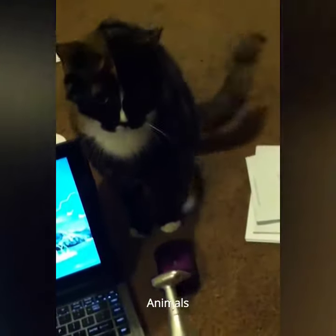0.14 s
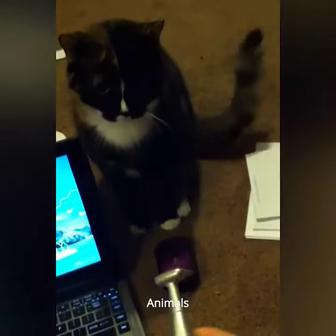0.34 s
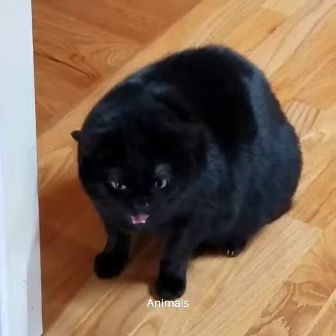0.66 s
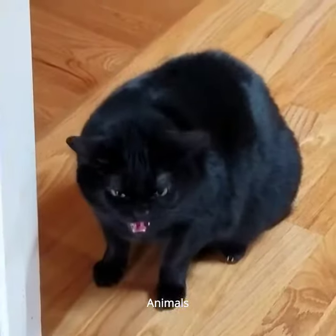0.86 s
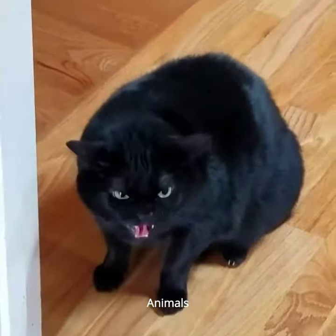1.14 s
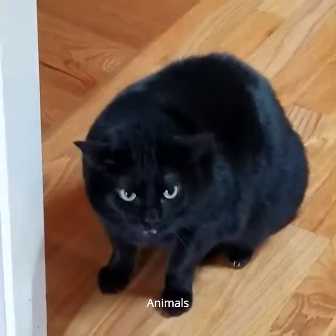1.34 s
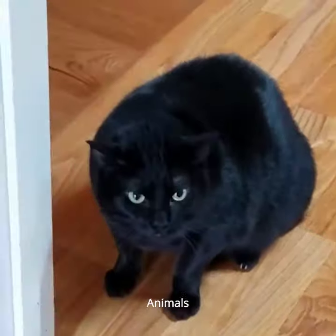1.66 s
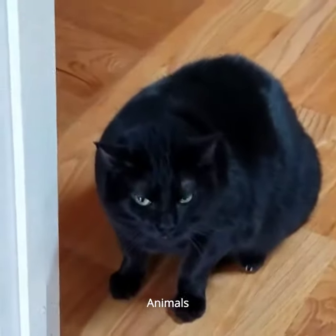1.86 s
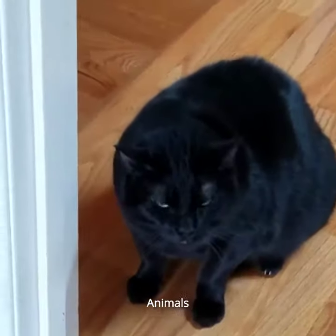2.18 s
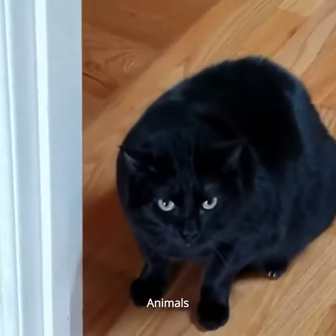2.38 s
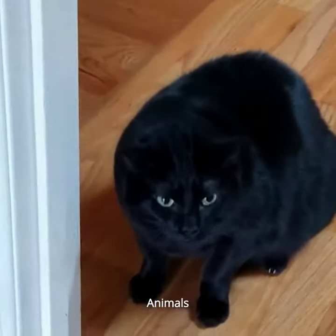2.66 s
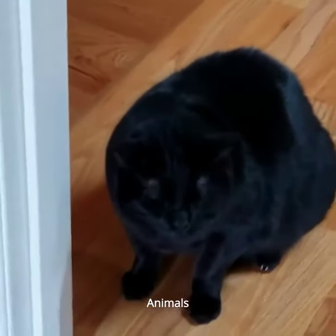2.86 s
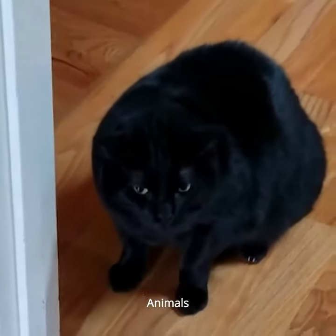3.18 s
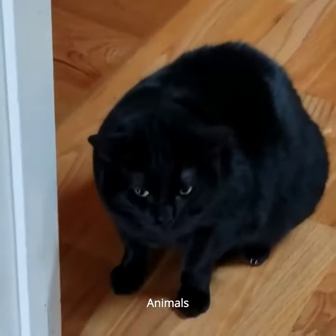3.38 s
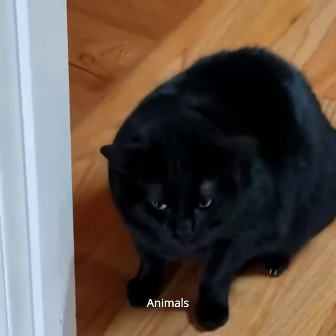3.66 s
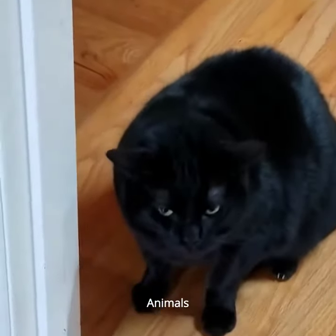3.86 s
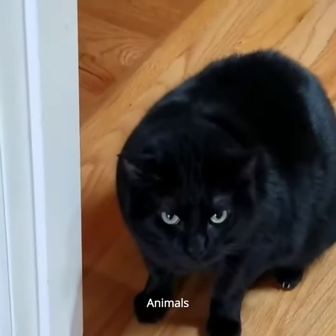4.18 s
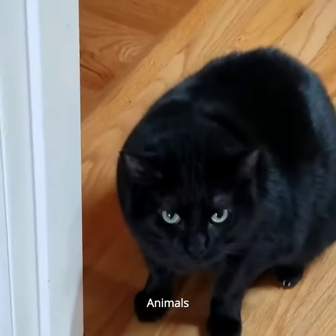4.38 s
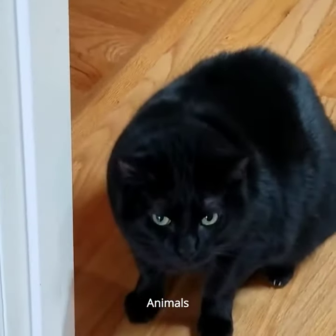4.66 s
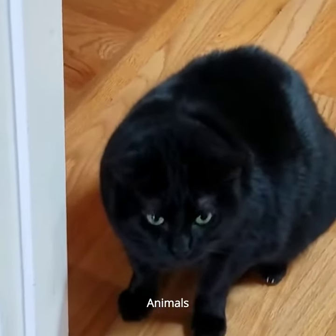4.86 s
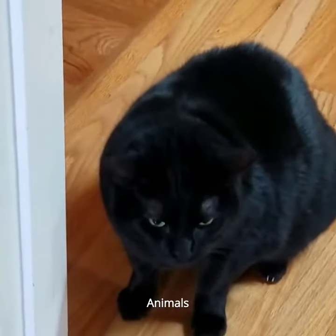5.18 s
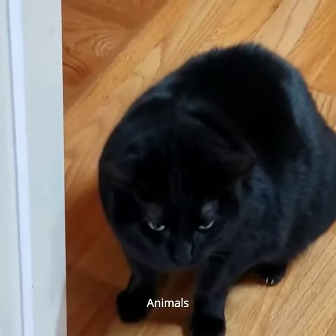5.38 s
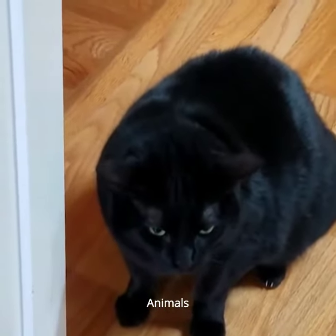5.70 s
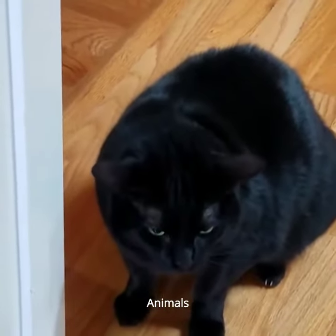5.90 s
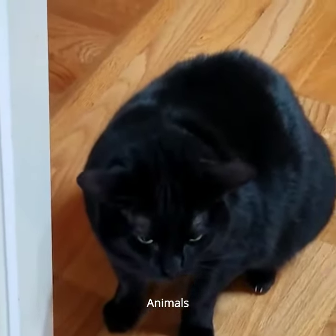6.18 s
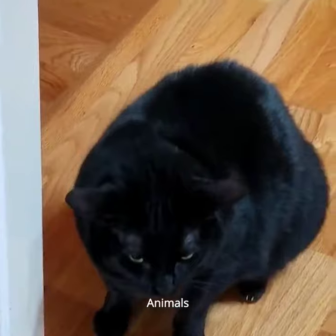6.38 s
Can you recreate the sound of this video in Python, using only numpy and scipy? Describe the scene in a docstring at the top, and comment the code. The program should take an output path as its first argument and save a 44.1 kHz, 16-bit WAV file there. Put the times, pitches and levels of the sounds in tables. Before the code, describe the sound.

A small electric appliance buzzes with a rapid, clicking plastic rattle for just over half a second, then cuts off. In a lightly reverberant room with a faint low engine drone, a cat gives a short breathy hiss with a low grumble. After soft bumps it yowls long and loud, sinks into a growl, then rises into a second yowl that ends in a ragged screech. The microphone is close.

```python
"""A small electric appliance buzzes and rattles; then the scene cuts to a cat on a wooden floor.
Its strokes repeat a click, softer knocks and a scrape. After soft scuffs of band-limited noise the cat
hisses: shaped noise over a loose grumble. It yowls twice without a pause, as harmonics picked out by moving
resonances, sinking to a growl in between and breaking into a screech at the end. Sparse reflections answer
the cat and the scuffs; a far engine, a few low orders of a falling rate, drones over the air of the room."""
import sys
import numpy as np
from scipy import signal
from scipy.fft import rfft, irfft, next_fast_len
from scipy.io import wavfile
from scipy.ndimage import map_coordinates

SR = 44100
rng = np.random.default_rng(int(sys.argv[2]) if len(sys.argv) > 2 else 0)


def persist_wave(psi):
    """Save psi, clipped to +-1, as 16-bit WAV."""
    counts = np.round(np.clip(psi, -1, 1) * 32767).astype(np.int16)
    wavfile.write(sys.argv[1], SR, np.atleast_2d(counts).T)


N = 288414
T = np.arange(N) / SR  # t/s
HZ = np.fft.rfftfreq(N, 1 / SR)  # f/Hz
CUT_S = 0.631  # the change of scene

# All levels are relative, before the gains applied where the sounds are summed.
# Appliance stroke rate: [t/s, f/Hz]
STROKE_RATE = [(0, 55.3), (.09, 55.55), (.14, 54.45), (.2, 54.8), (.28, 55.25), (.41, 55.35), (.47, 55.7),
               (.53, 55.3), (.58, 54.3), (.64, 54.8)]
# Main click of each stroke
CLICK_HZ, CLICK_S, CLICK_DB = 6300, .00009, -23.5
# Ringing of the plastic housing: [f/Hz, level/dB, t60/s]
HOUSING_MODES = [(4340, -52, 0.021), (4700, -47, 0.023), (4720, -44, 0.029), (5640, -45, 0.048),
                 (7800, -47, 0.018), (2070, -53, 0.048), (3130, -51, .05)]
# Softer knocks within a stroke: [place in the stroke 0-1, level/dB, f/Hz, length/s]
KNOCKS = [(.014, 5, 6800, .0001), (.115, -2, 4400, .0004), (.325, -3, 5600, .00025), (.34, -4, 4500, .0006),
          (.33, -14, 2000, .0008), (.445, 0, 5600, .0005), (.49, -3, 7800, .0004), (.52, -2, 5800, .0003),
          (.535, -2, 7300, .0002), (.55, -4, 3500, .0004), (.68, -8, 5800, .0005), (.77, -5, 5500, .00025),
          (.78, -9, 3300, .0003), (.89, -7, 4500, .0004), (.935, -4, 7000, .0003), (.945, -3, 4500, .0003)]
# Spectrum of the scraping parts: [f/Hz, level/dB]
RATTLE_COLOUR = [(700, -50), (1200, -38), (1650, -12), (2050, -0.5), (2250, -4.5), (2600, -5.5), (3050, -5),
                 (3900, -3), (4500, 4), (5060, -5.5), (5680, -2), (6700, -9), (8000, -3), (9200, -11.5),
                 (11000, -36), (15000, -37)]
RATTLE_DB = -44.5
# Spectrum of the low hum: [f/Hz, level/dB]
HUM_COLOUR = [(65, -43), (110, -8), (221, -3.5), (332, -12.5), (404, -14.5), (451, -18), (632, -11),
              (1200, -17.5), (1500, -14), (1950, -29), (3300, -120)]
HUM_DB = -55
# Low tones of the motor: [multiple of the stroke rate, level/dB]
MOTOR_TONES = [(2, -64.5), (3, -71), (4, -60.5)]

# Far engine's orders 1, 2 and 3: [t/s, level/dB, level/dB, level/dB]
ENGINE_ORDERS = [(.63, -53.5, -60, -66), (1.85, -53, -56, -66), (2.3, -53, -59, -66), (3.0, -55, -52, -62),
                 (4.0, -66.5, -59, -62), (5.3, -50.5, -58, -62), (6.54, -57.5, -64, -60)]
ENGINE_HZ, ENGINE_SAG_HZ_PER_S = 73.2, 1.72  # firing rate at the cut, and its fall
# Spectrum of the still air: [f/Hz, level/dB]
AIR_COLOUR = [(18, -34.5), (30, -13.5), (69, -18), (108, -14.5), (144, -14), (369, -12.5), (410, -21.5),
              (532, -16), (691, -19), (830, -24.5), (1050, -25), (2830, -29.5), (3880, -35.5), (15500, -54)]
AIR_DB = -56.5
# Wavering top hiss: level/dB [outside the strong parts of the yowls, within them, within them]
SHEEN_DB = [-67.5, -61, -61]
# Reverberation time of the room: [f/Hz, t60/s]
ROOM_DECAY = [(150, 0.25), (500, 0.73), (1000, 0.5), (3000, 0.74), (10000, 0.3)]
# Scuffs, spits and bumps: [t/s, level/dB, centre f/Hz, width/octaves, rise/s, decay/s]
SCUFFS = [(.66, -57.5, 2280, 0.12, 0.065, 0.22), (.66, -53, 1440, 1.3, 0.45, 0.068),
          (0.707, -45.5, 167, 1, 0.052, 0.076), (.889, -53, 1190, 0.81, .001, 0.0047),
          (1.46, -57, 8850, 6.1, 0.041, 0.049), (1.571, -43, 219, 0.47, 0.0055, 0.013),
          (1.891, -63, 4000, 1.8, 0.0042, 0.073), (2.009, -44, 65, 1.68, 0.029, 0.029),
          (2.224, -48, 1690, 0.53, 0.01, 0.05), (2.276, -38.5, 109, 1.32, 0.035, 0.018),
          (2.28, -57.5, 780, 0.76, 0.0074, 0.1), (2.315, -59, 13000, 2.5, 0.1, 0.11),
          (2.46, -46.5, 65, 0.64, 0.0063, 0.012), (2.641, -64, 8100, 3, 0.025, 0.012),
          (3.599, -46.5, 223.5, 0.42, 0.031, 0.066), (4.071, -38.5, 261, 0.91, 0.047, 0.031),
          (4.37, -46, 110.5, 1.53, 0.017, 0.032)]

# Spectrum of the hiss: [f/Hz, level/dB]
HISS_COLOUR = [(120, -9), (200, -4), (350, -3.5), (550, -13), (750, -3), (980, 1), (1180, 0), (1500, -9),
               (2300, -14.5), (3200, -22.5), (4200, -22), (7000, -25.5), (10000, -26), (15500, -22.5)]
HISS_START_S, HISS_END_S, HISS_RISE_S, HISS_FALL_S = 0.9, 1.282, 0.066, 0.025
HISS_MOUTH_DB, HISS_FIZZ_DB, HISS_SWELL_DB_PER_S = -43, -51.5, 3.5
# Low grumble under the hiss: resting pitch and height of its arch
GRUMBLE_HZ, GRUMBLE_ARCH_HZ, GRUMBLE_DB, GRUMBLE_SWELL_DB_PER_S = 182, 59.8, -54, 21

YOWL_START_S, YOWL_RISE_S = 2.55, 0.24
# Pitch climbs out of a growl, holds, sinks back and climbs again: [t/s, f/Hz]
PITCH = [(2.58, 151.6), (2.645, 140.2), (2.685, 204.7), (2.76, 270.3), (2.8, 325.5), (2.88, 385.4),
         (2.995, 451.2), (3.32, 473.7), (3.39, 464.2), (3.58, 501.2), (3.8, 504.5), (3.96, 525.8),
         (4.09, 487.5), (4.4, 447.8), (4.52, 415.5), (4.565, 388.5), (4.61, 331.5), (4.71, 321.8),
         (4.78, 263.4), (4.9, 212.2), (4.98, 193.7), (5.09, 237.4), (5.19, 289.5), (5.27, 356.8),
         (5.39, 388), (5.46, 362), (5.69, 423.7), (5.9, 475), (6.2, 498.1), (6.355, 519.8), (6.38, 548.2),
         (6.42, 553.6), (6.44, 586), (6.47, 555.4), (6.54, 585.7)]
# How hard the cat pushes, as the level of its mouth's ring: [t/s, level/dB]
EFFORT = [(2.6, -77), (2.72, -47), (2.82, -41.5), (3.12, -40), (3.25, -34), (3.33, -28), (3.385, -15),
          (3.45, -21.5), (3.69, -14), (3.79, -13), (3.9, -24.5), (4.03, -28), (4.15, -40.5), (4.57, -46),
          (4.595, -35.5), (4.74, -38), (4.85, -52.5), (5.08, -46.5), (5.18, -34.5), (5.33, -44.5),
          (5.5, -38.5), (5.58, -33.5), (5.74, -21.5), (5.82, -24.5), (6.02, -22), (6.115, -29), (6.16, -19),
          (6.45, -21.5), (6.5, -29), (6.54, -27)]
# Opening of the mouth: [t/s, 0 shut - 1 wide]
MOUTH = [(2.6, .01), (3.3, 0.1), (3.44, 0.51), (3.8, 0.52), (4.02, 0.16), (4.22, 0.013), (5.4, 0.033),
         (5.63, 0.34), (5.95, 0.62), (6.33, 0.79), (6.54, 0.98)]
# Tighter folds sound brighter: [pitch f/Hz, fundamental level/dB, level added to overtones/dB]
FOLDS = [(147, -34.5, -23.5), (202, -34.5, -26), (267, -40.5, -21.5), (324, -36.5, -19), (407.5, -45, -16),
         (444.5, -44.5, -10), (493, -41, -3.5), (524, -40.5, -4.5), (580, -46.5, 5.5)]
# Folds beat raggedly when slack or overstrained: [pitch f/Hz, roughness 0-1]
RAGGED = [(150, .52), (200, .5), (270, .38), (325, .22), (382, .04), (450, .03), (507, .022), (535, .03),
          (570, .12)]
GROWL_PULSE_HZ, GROWL_PULSE_DEPTH = 42, .75
# What the mouth adds to the fundamental: level/dB [shut, half open, wide]
FUNDAMENTAL_DB = [0.5, -4, 4.5]
# The least the harmonics keep: level/dB [second, third]
CHEST_DB = [-55, -57]
# Fourth harmonic, near 2 kHz: [t/s, level/dB]
FOURTH = [(2.9, -76.5), (3.02, -53), (3.08, -45), (3.16, -60.5), (3.29, -46.5), (3.48, -44), (3.62, -45),
          (3.85, -50.5), (3.95, -36), (4.06, -54), (4.25, -70.5), (5.48, -65), (5.67, -49), (5.8, -69.5),
          (6.3, -52)]
# The mouth's ring: f/Hz [shut, half open, wide]
MOUTH_HZ = [500, 960, 1560]
MOUTH_WIDTH_HZ = 198
# Throat resonances, rows nasal ring, bright edge, thin top: f/Hz [shut, half open, wide]
THROAT_HZ = [(2254, 2195, 2565), (3560, 4380, 4220), (4970, 6300, 4800)]
# The same rows: level/dB [shut, half open, wide]
THROAT_DB = [(-42, -39, -35.5), (-59.5, -57, -51.5), (-64, -66, -73)]
# The same rows: half width/Hz [shut, half open, wide]
THROAT_WIDTH_HZ = [(240, 290, 380), (340, 180, 330), (220, 300, 300)]
# Share of the folds' brightness taken up: [nasal ring, bright edge, thin top]
THROAT_SHARE = [1, 0.78, 0.78]
THROAT_SPREAD = 0.58  # mouth opening that spreads the throat fully; beyond it only the jaw drops
# Faint resonances above the throat: [f/Hz shut, f/Hz half open, f/Hz wide, level/dB]
TOP_RINGS = [(6900, 7900, 16000, -72.5), (8480, 8800, 9100, -72)]
# The voice catches, turning airy, rough and bright: [t/s, air level/dB, added roughness 0-1,
# level added/dB to the nasal ring, to the bright edge, to the thin top, rise/s, decay/s]
CATCHES = [(2.82, -53, 0.07, 3, 6, 11, 0.014, .04), (2.955, -64, 0, 16.5, -2, 0, 0.022, 0.035),
           (3.141, -56, 0.02, 0.5, 2, 12.5, .04, 0.047), (3.279, -56, 0, 7, 14, 12, 0.036, 0.065),
           (3.44, -60, 0.01, -1, 10, 6.5, .05, .08), (3.59, -55, 0.01, 0, -2, -5, .03, 0.024),
           (3.965, -63, 0.08, 13, 11, 20, 0.035, .04), (4.023, -38.5, 0.06, -13, 16.5, 9, 0.014, 0.058),
           (4.14, -74, 0.01, -4.5, 13, -2, 0.066, .16), (4.38, -47.5, 0, 2, 5, -6, 0.022, 0.038),
           (4.589, -56, 0.15, 7, 0, -12, .008, 0.05), (5.58, -60.5, 0.03, 18, 21, -1, 0.05, 0.063),
           (5.67, -43.5, 0.02, 0, 5.5, 16.5, 0.04, 0.04), (5.88, -52, 0.25, -4, -3, 10, 0.018, 0.073),
           (6.38, -57, 0.06, 11.5, 2, 9, 0.009, 0.047)]
# Spectrum of the creak: [f/Hz, level/dB]
CREAK_COLOUR = [(70, -27.5), (150, 5), (230, 5), (400, 2.5), (700, -13.5), (1000, -12.5), (1500, -33),
                (3000, -57.5)]
# Spectrum of the air rushing past the folds: [f/Hz, level/dB]
RASP_COLOUR = [(150, -15.5), (500, -13), (850, -3), (1150, 5.5), (1700, -4), (2300, 2.5), (2900, -7.5),
               (3500, -17), (4400, -11), (5500, -19.5), (9000, -20), (15500, -23.5)]
# Strength of that air: level/dB [shut, half open, wide]
RASP_DB = [-64, -58.5, -40]
# Level of the left ear over the right: level/dB [shut, half open, wide]
PAN_DB = [-2.5, -4, -6]
# Thin whistle: [t/s, f/Hz, level/dB]
WHISTLE = [(3.48, 15450, -70.5), (3.58, 14880, -67.5), (3.66, 14100, -63.5), (3.73, 13900, -69),
           (3.799, 13630, -72)]
# Screech in three surges: [t/s, level/dB]
SCREECH = [(6.2, -110), (6.35, -44.5), (6.385, -32), (6.42, -32), (6.445, -26), (6.46, -32.5), (6.477, -20),
           (6.492, -25), (6.52, -19.5), (6.54, -19.5)]
SCREECH_ROUGH = 0.4
# Wide-open throat of the screech: [f/Hz, half width/Hz, level/dB]
SCREECH_THROAT = [(1090, 190, -14), (1620, 270, 0), (2130, 180, -5), (2940, 170, -3.5)]
EDGE_HZ = 15800  # upper band limit


def amp(db):
    """Decibel law: amplitude ratio of a level."""
    return np.exp(np.asarray(db) * (np.log(10) / 20))


def evened(x):
    """Normalisation to an rms of 1."""
    return x / np.sqrt(np.mean(x ** 2) + 1e-20)


def read(points, hz):
    """Interpolation of a spectrum on a log-frequency axis."""
    f, value = np.transpose(points)
    return np.interp(np.log(hz + 1), np.log(f + 1), value)


def curves(rows):
    """Interpolation in time of each column of a table."""
    s, *columns = np.transpose(rows)
    return [np.interp(T, s, c) for c in columns]


def at_pitch(rows, pitch):
    """Interpolation over pitch of each column of a table."""
    hz, *columns = np.transpose(rows)
    return [np.interp(pitch, hz, c) for c in columns]


def phase(hz):
    """Phase as the running integral of frequency, in radians."""
    return 2 * np.pi * np.cumsum(hz) / SR


def colour(x, db):
    """Linear filtering by a dB curve; rms 1."""
    return evened(irfft(rfft(x) * amp(db), N))


def above(hz, order=4):
    """High-pass response, as a dB curve."""
    return -10 * np.log10(1 + (hz / (HZ + 1)) ** (2 * order))


def wander(hz, size=16):
    """Low-pass random fluctuation up to a rate; rms 1."""
    count = next_fast_len(N // size + 2)
    gain = (1 + (np.fft.rfftfreq(count, size / SR) / hz) ** 4) ** -.5
    slow = evened(irfft(rfft(rng.standard_normal(count)) * gain, count))
    return np.interp(T, np.arange(count) * size / SR, slow)


def pair(side):
    """Partial coherence: noise at two ears, partly shared."""
    a, b = rng.standard_normal((2, N))
    return np.array([a + side * b, a - side * b])


def pan(db):
    """Interaural level difference: left and right gains with a mean of 1."""
    g = amp(np.array([db, -db]).reshape(2, -1) / 2)
    return g / g.mean(0)


def peak(hz, centre, width):
    """Resonance: the gain of a steep-sided peak."""
    away = 1 + ((hz - centre) / width) ** 2
    return 1 / (away * np.sqrt(away))


def swell(start, end, rise, decay):
    """Exponential envelope that grows until start, holds until end and dies away."""
    return np.exp(-np.maximum(np.maximum((start - T) / rise, (T - end) / decay), 0))


def glide(values, position, last=1):
    """Interpolation between three values placed at 0, a half and last."""
    return np.interp(position, [0, .5, last], values)


def by_mouth(values, wide=1):
    """Articulation: glides between the values for a shut, a half open and a wide mouth."""
    return glide(values, curves(MOUTH)[0], wide)


def knock(age, hz, length):
    """Impact: a burst at one pitch whose envelope peaks after its length and dies away."""
    u = np.maximum(age, 0) / length
    return u * np.exp(1 - u) * np.sin(2 * np.pi * hz * age)


def appliance(knocks_db=-35):
    """Periodic excitation: every stroke clicks, rings the plastic housing, knocks and scrapes."""
    first_click_s, uneven_db, play_s, loose = .0045, 2.2, .000018, .5
    rate, = curves(STROKE_RATE)
    turns = np.cumsum(rate) / SR - first_click_s * rate[0]
    stroke, number = turns % 1, np.floor(turns).astype(int)
    age = stroke / rate  # seconds since the click
    click = amp(CLICK_DB) * knock(age, CLICK_HZ, CLICK_S)
    ring = sum(amp(db - 60 * age / t60) * np.sin(2 * np.pi * hz * age) for hz, db, t60 in HOUSING_MODES)

    # each knock varies a little in force, and its place creeps from stroke to stroke
    knocks = 0
    for at, db, hz, length in KNOCKS:
        force, creep = rng.standard_normal((2, number[-1] + 2))
        gain = amp(knocks_db + db + uneven_db * force)[number]
        delay = at / rate + play_s * np.cumsum(creep)[number]
        knocks = knocks + gain * knock(age - delay, hz, length)

    # the parts scrape alike from stroke to stroke, shifting slowly, with some loose play
    grains = rng.standard_normal((2, SR // 10))
    place = [stroke * SR / rate.mean()]
    one, other = (map_coordinates(grain, place, order=3) for grain in grains)
    shift = 4 * T
    scrape = one * np.cos(shift) + other * np.sin(shift) + loose * rng.standard_normal(N)
    rattle = amp(RATTLE_DB) * colour(scrape, read(RATTLE_COLOUR, HZ))
    hum = amp(HUM_DB) * colour(.5 * scrape + rng.standard_normal(N), read(HUM_COLOUR, HZ))
    tones = sum(np.sqrt(2) * amp(db) * np.sin(2 * np.pi * round(k) * turns) for k, db in MOTOR_TONES)

    band = signal.butter(9, [95, 9400], "band", fs=SR, output="sos")
    small = signal.butter(2, 1400, "high", fs=SR, output="sos")
    impacts = signal.sosfilt(small, click + ring + knocks)
    return signal.sosfilt(band, impacts + hum + tones) + rattle


def background(waver_db=2):
    """Harmonic series and broadband noise: a far engine's lowest orders over the still air."""
    hz = ENGINE_HZ - ENGINE_SAG_HZ_PER_S * (T - CUT_S)
    turns = phase(hz * (1 + 0.0053 * wander(17)))
    engine = 0
    for k, db in enumerate(curves(ENGINE_ORDERS), 1):
        engine = engine + np.sqrt(2) * amp(db - 4.0 + waver_db * wander(9.1)) * np.sin(k * turns)
    shape = read(AIR_COLOUR, HZ) + above(64, order=1)
    air = colour(pair(0.58), shape) * amp(AIR_DB + 0.18 * wander(3.2))
    return (engine + air) * pan(-1.6)


def sheen(waver_db=2):
    """High-passed noise: a thin, wide, wavering top hiss, louder during the strong parts of the yowls."""
    strength, = curves(MOUTH)  # this curve also marks the strong parts of the yowls
    level_db = glide(SHEEN_DB, strength)
    return colour(pair(0.64), above(12000)) * amp(level_db + waver_db * wander(4))


def room(x, wet_db, mono_hz=450, apart=0.98):
    """Reverberation: sparse reflections die by band; the bass is alike at both ears."""
    size = 20  # samples per reflection
    at = np.arange(size * size // 2, SR - size, size)
    places = at + rng.integers(0, size, (2, len(at)))
    taps = np.zeros((2, SR))
    np.put_along_axis(taps, places, rng.choice([-1., 1.], (2, len(at))), 1)
    hz, t, z = signal.stft(taps, SR, nperseg=256)
    z = z * amp(-60 * t / read(ROOM_DECAY, hz)[:, None])
    side = apart * z[1] * (hz ** 2 / (hz ** 2 + mono_hz ** 2))[:, None]
    tail = signal.istft(np.array([z[0] + side, z[0] - side]), SR, nperseg=256)[1]
    wet = signal.fftconvolve(x, tail / np.linalg.norm(tail[0]), axes=1)[:, :N]
    return (x + amp(wet_db) * wet) / np.sqrt(1 + amp(wet_db) ** 2 / 2)


def scuffs():
    """Band-limited noise: each scuff is a soft-edged puff about one pitch."""
    out, noise = np.zeros((2, N)), rfft(pair(0.36))
    for s, db, hz, octaves, rise, decay in SCUFFS:
        band = np.exp(-.5 * (np.log2((HZ + 1) / hz) / octaves) ** 2)
        out += evened(irfft(noise * band, N)) * amp(db) * swell(s, s, rise, decay)
    return out


def hiss_envelope(swell_db_per_s):
    """Breath envelope: starts quickly, grows while it is held and stops."""
    held_s = np.clip(T, HISS_START_S, HISS_END_S) - HISS_START_S
    return swell(HISS_START_S, HISS_END_S, HISS_RISE_S, HISS_FALL_S) * amp(swell_db_per_s * held_s)


def hiss(crackle_db=2, split_hz=3000, spits_per_s=70, spit_size=13):
    """Turbulence: air sputters through the wet, open mouth and fizzes at the teeth."""
    spits = (rng.random(N) < spits_per_s / SR) * rng.uniform(0.41, 1, N) * spit_size
    air = pair(0.49) * amp(crackle_db * wander(250)) + spits
    shape, high = read(HISS_COLOUR, HZ), above(split_hz)
    low = 10 * np.log10(1 - amp(high) ** 2 + 1e-12)  # the power left below the split
    mouth = colour(air, shape + low) * amp(HISS_MOUTH_DB)
    fizz = colour(air, shape + high) * amp(HISS_FIZZ_DB)
    return (mouth + fizz) * hiss_envelope(HISS_SWELL_DB_PER_S) * pan(-1.6)


def grumble(jitter=0.081, slope_db=-8, top_s=1.13, half_length_s=0.16):
    """Frequency jitter: the folds flap loosely during the hiss, in one arch of pitch."""
    arch = np.maximum(1 - ((T - top_s) / half_length_s) ** 2, 0)
    pitch = GRUMBLE_HZ + GRUMBLE_ARCH_HZ * arch
    turns = phase(pitch * (1 + jitter * wander(80)))
    folds = evened(sum(amp(slope_db * k) * np.cos(k * turns) for k in range(1, 4)))
    return folds * amp(GRUMBLE_DB) * hiss_envelope(GRUMBLE_SWELL_DB_PER_S)


def strain(pitch, air_db=-2, screech_air_db=-40):
    """Fold tension: fundamental dB, throat resonance dB, roughness and air gain of the voice."""
    base, bright = at_pitch(FOLDS, pitch)
    rough, = at_pitch(RAGGED, pitch)
    levels = np.array([by_mouth(db, THROAT_SPREAD) + share * bright
                       for db, share in zip(THROAT_DB, THROAT_SHARE)])
    screech_db, = curves(SCREECH)
    broken = amp(screech_db - screech_db.max())
    air = amp(by_mouth(RASP_DB)) + amp(screech_air_db) * broken
    rough = rough + SCREECH_ROUGH * broken
    for s, db, ragged, *lifts, rise, decay in CATCHES:
        catch = swell(s, s, rise, decay)
        air = air + amp(db) * catch
        rough = rough + ragged * catch
        levels = levels + np.outer(lifts, catch)
    return base + by_mouth(FUNDAMENTAL_DB), levels, np.clip(rough, 0, .9), air * amp(air_db)


def low_harmonics(pitch, base_db, nasal_db, spill_db=-12):
    """Mouth resonance: gains of harmonics 1-4; a dropping jaw moves the ring up from the second."""
    share = np.array([peak(k * pitch, by_mouth(MOUTH_HZ), MOUTH_WIDTH_HZ) for k in range(2, 5)])
    ring = share / np.linalg.norm(share, axis=0) * amp(curves(EFFORT)[0])
    second, third = np.hypot(ring[:2], amp(CHEST_DB)[:, None])
    third = np.hypot(third, amp(nasal_db + spill_db))  # the nasal ring spills onto the third
    fourth = np.hypot(ring[2], amp(curves(FOURTH)[0]))
    return [amp(base_db), second, third, fourth]


def throat_harmonics(pitch, turns, levels, flutter_db=3.0, skirt=0.0066, upper_db=-3.0):
    """Formants: three moving throat resonances pick out the high harmonics."""
    centres = np.array([by_mouth(hz, THROAT_SPREAD) for hz in THROAT_HZ])
    widths = np.array([by_mouth(hz, THROAT_SPREAD) for hz in THROAT_WIDTH_HZ])
    upper, power = np.zeros((3, N)), np.zeros((3, N))
    for k in range(4, 21):
        share = peak(k * pitch, centres, widths)
        share[-1] += skirt  # the thin top lets a trace of every harmonic through
        tone = np.cos(k * turns + rng.uniform(0, 2 * np.pi))
        upper += share * (tone * amp(flutter_db * wander(10)))
        power += share ** 2
    return (upper / np.sqrt(power) * amp(levels + upper_db)).sum(0)


def overtones(pitch, turns, width_hz=260):
    """Resonance: two faint rings climb as the mouth opens and light up the harmonics they cross."""
    _, bright = at_pitch(FOLDS, pitch)
    rings = [(by_mouth(hz, THROAT_SPREAD), amp(db + bright)) for *hz, db in TOP_RINGS]
    total = 0
    for k in range(14, 23):
        gain = sum(level * peak(k * pitch, hz, width_hz) for hz, level in rings)
        total = total + np.cos(k * turns) * gain
    return total


def yowl(jitter=.07, shimmer=0.69, flap_spread=.3, tremor=.002, throb=2.1, voice_db=-1.5, creak_db=3):
    """Source and filter: folds beating cleanly or raggedly drive the mouth and throat."""
    pitch, = curves(PITCH)
    base, levels, rough, air = strain(pitch)
    turns = phase(pitch * (1 + tremor * wander(18) + jitter * rough * wander(120)))
    # as soon as the folds are a little unsteady, each low harmonic throbs
    depth = np.minimum(throb * rough, .3)
    low = 0
    for k, gain in enumerate(low_harmonics(pitch, base, levels[0]), 1):
        low = low + gain * (1 + depth * np.tanh(wander(37))) * np.cos(k * turns)
    voice = amp(voice_db) * low + throat_harmonics(pitch, turns, levels) + overtones(pitch, turns)
    # ragged folds beat with uneven force, and part of their tone turns into a low creak
    voice *= np.sqrt(2 * (1 - rough ** 2)) * (1 + shimmer * rough * np.tanh(wander(59)))
    puffs = 1 + 0.8 * np.cos(turns)  # air escapes each time the folds part
    creak = colour(puffs * rng.standard_normal(N), read(CREAK_COLOUR, HZ))
    creak = creak * rough ** 1.57 * amp(base + creak_db)
    rasp = colour(pair(1.0) * puffs, read(RASP_COLOUR, HZ)) * air
    # slack folds also flap in slow, uneven bursts
    flaps = np.cos(phase(GROWL_PULSE_HZ * (1 + flap_spread * wander(30))))
    pulsing = 1 + GROWL_PULSE_DEPTH * at_pitch(RAGGED, pitch)[0] * flaps
    onset = np.clip((T - YOWL_START_S) / YOWL_RISE_S, 0, 1)
    cry = (voice + creak) * pulsing + rasp + screech(turns, puffs)
    return cry * onset * pan(by_mouth(PAN_DB))


def whistle(waver=.004):
    """Gliding pure tone: a very high, thin whistle slides down while the first yowl is loudest."""
    hz, db = curves(WHISTLE)
    tone = np.sin(phase(hz * (1 + waver * wander(90))))
    return tone * amp(db) * swell(WHISTLE[0][0], WHISTLE[-1][0], .02, .02)


def screech(turns, puffs, slip=.65, slip_hz=170, lurch_db=5, air_share=.3):
    """Irregular phonation: overstrained folds slip and lurch, and with their air ring the wide throat."""
    level = amp(curves(SCREECH)[0])
    slipped = turns + slip * (level / level.max()) ** .55 * wander(slip_hz)
    lurch = amp(lurch_db * np.tanh(wander(110)))
    folds = evened(sum(np.cos(k * slipped) for k in range(2, 8)) * lurch)
    throat = sum(amp(db) * peak(HZ, hz, width) for hz, width, db in SCREECH_THROAT)
    air = colour(pair(0.96) * puffs, 20 * np.log10(throat))
    cry = irfft(rfft(folds * level) * throat, N)
    return evened(cry) * np.sqrt(np.mean(level ** 2)) + air_share * air * level


def scene():
    """Superposition: the appliance alone, then the cat in its room."""
    voiced = room(yowl() + whistle(), wet_db=-1.5)
    breath = room(hiss() + grumble() + scuffs(), wet_db=-1.0)
    after = np.clip((T - CUT_S) / .004 + .5, 0, 1)  # a 4 ms crossfade
    return (1 - after) * appliance() + after * (voiced + breath + background() + sheen())


def record(dry):
    """Band limitation: the microphone sheds the deepest bass, and a steep low-pass ends the treble."""
    thin = signal.sosfilt(signal.butter(3, 45, "high", fs=SR, output="sos"), dry)
    edge = signal.firwin(1023, EDGE_HZ, window=("kaiser", 9), fs=SR)
    return signal.oaconvolve(thin, edge[None], "same")


dry = scene()
out = record(dry)
persist_wave(out)
```